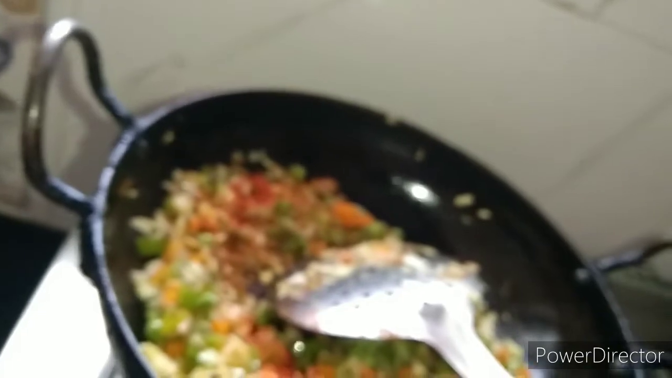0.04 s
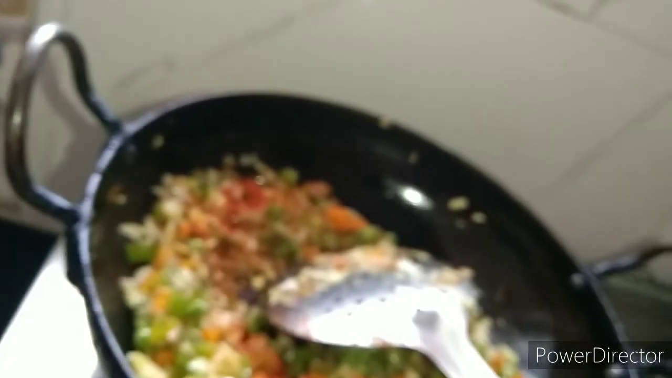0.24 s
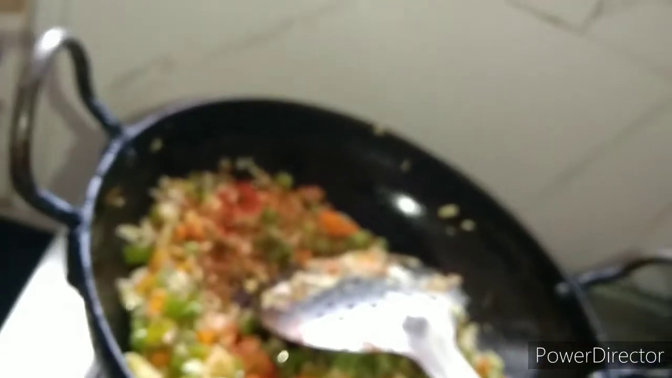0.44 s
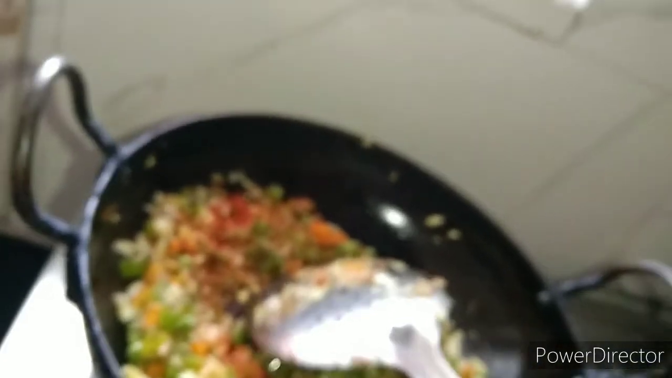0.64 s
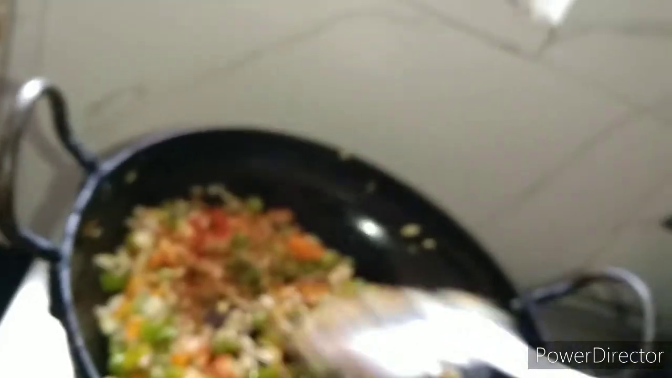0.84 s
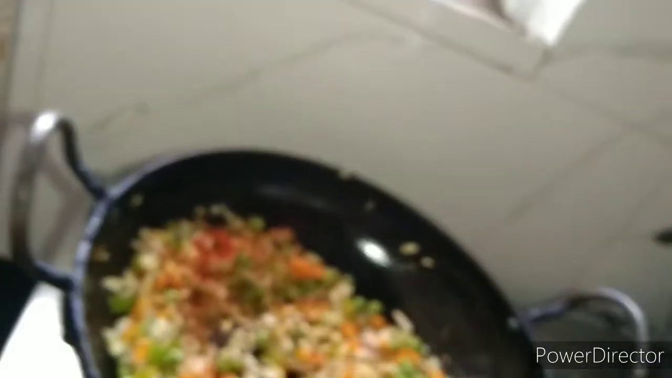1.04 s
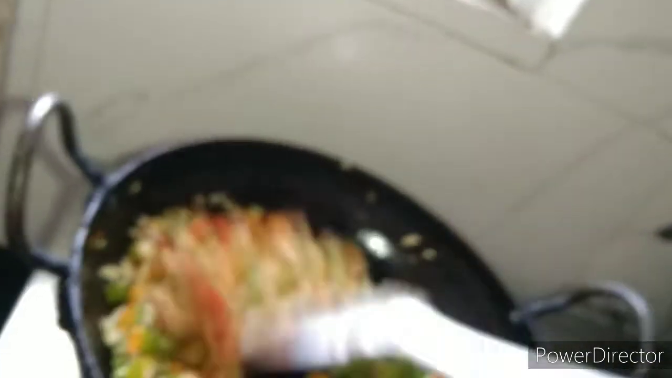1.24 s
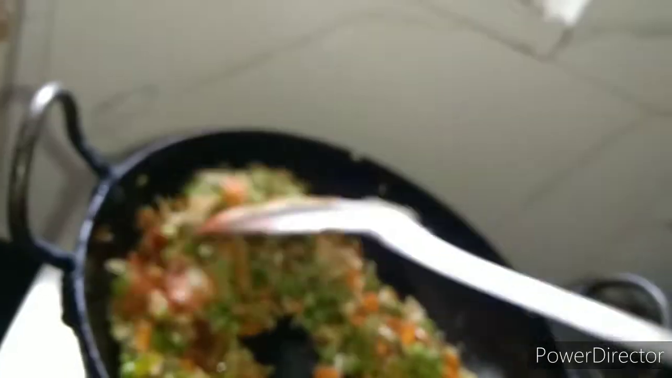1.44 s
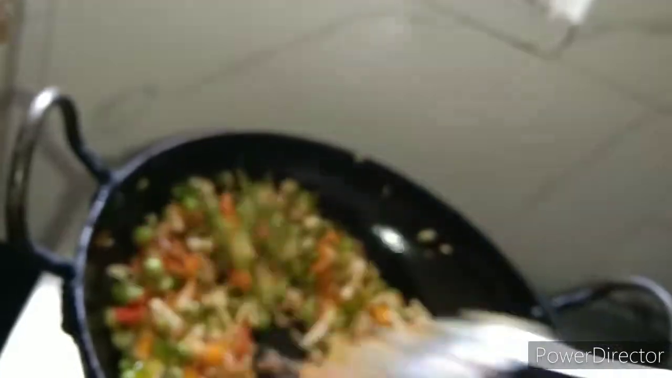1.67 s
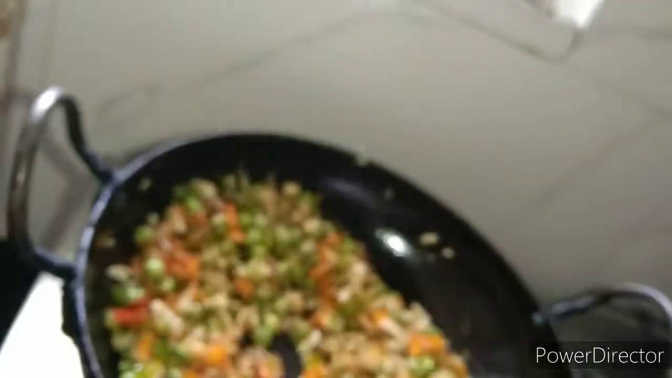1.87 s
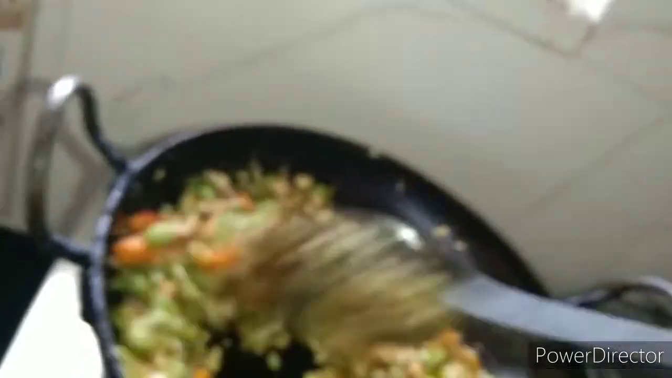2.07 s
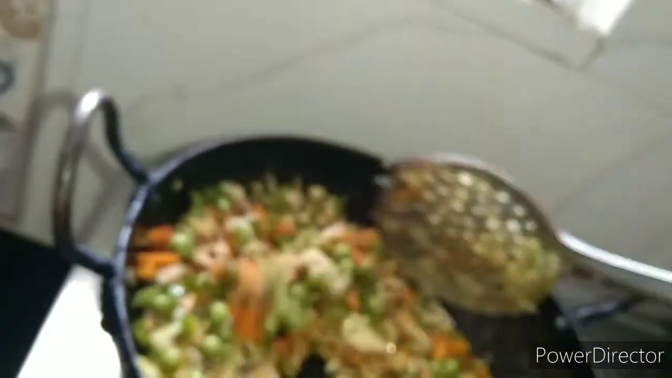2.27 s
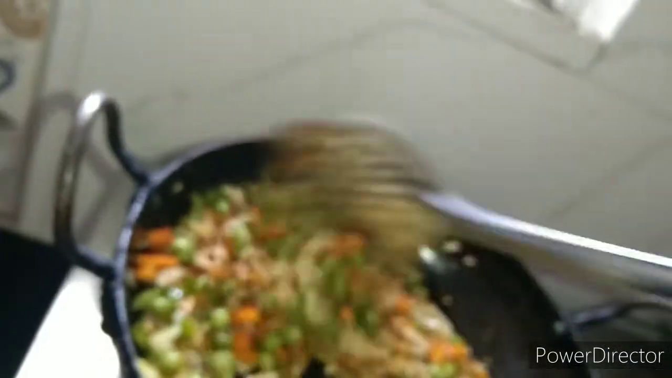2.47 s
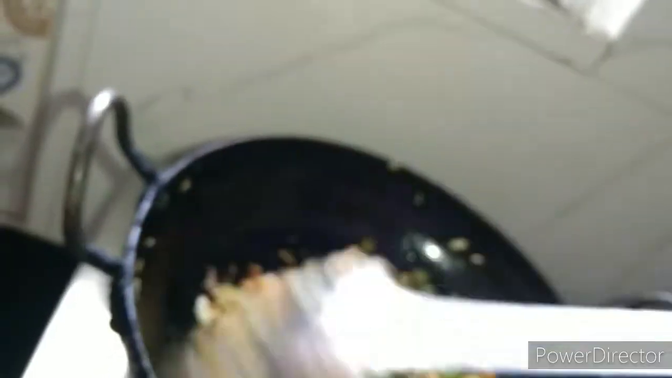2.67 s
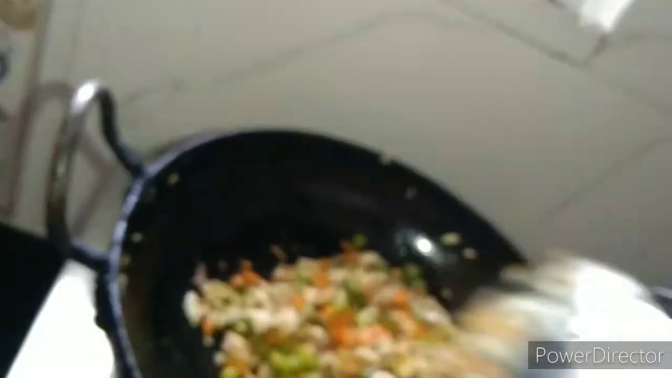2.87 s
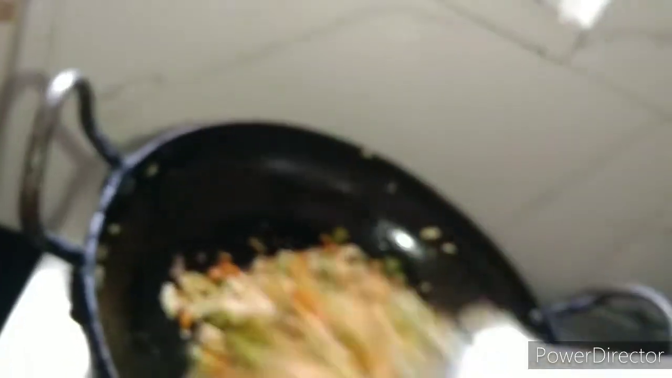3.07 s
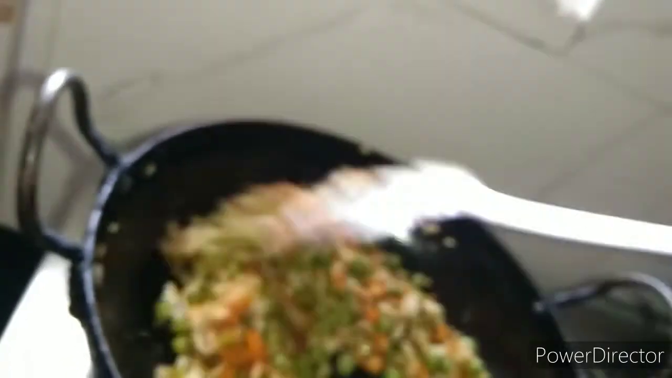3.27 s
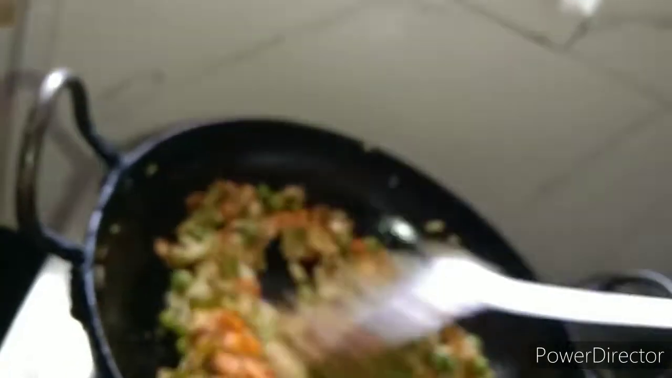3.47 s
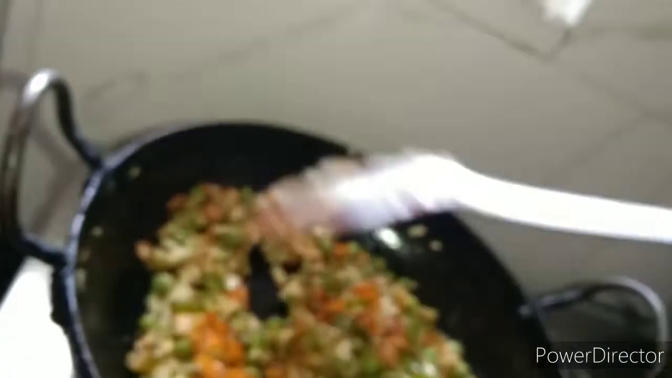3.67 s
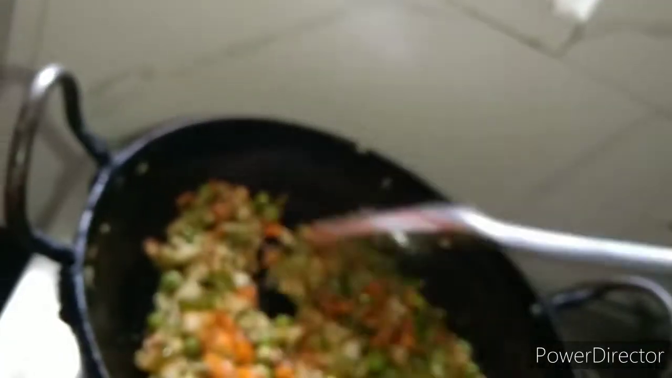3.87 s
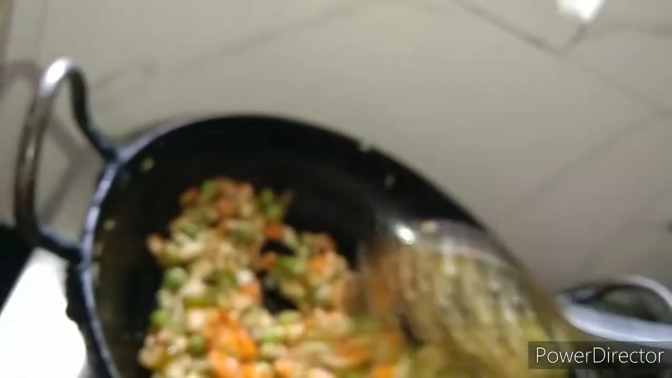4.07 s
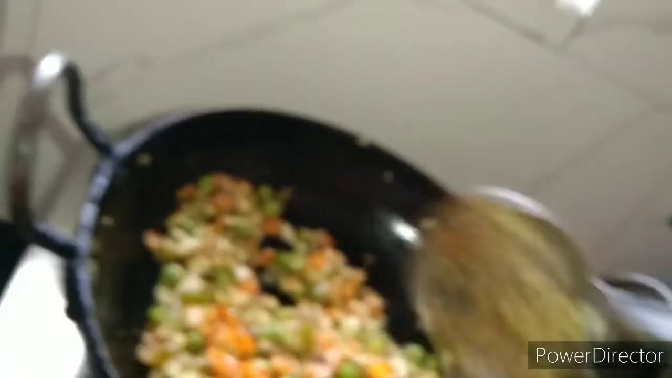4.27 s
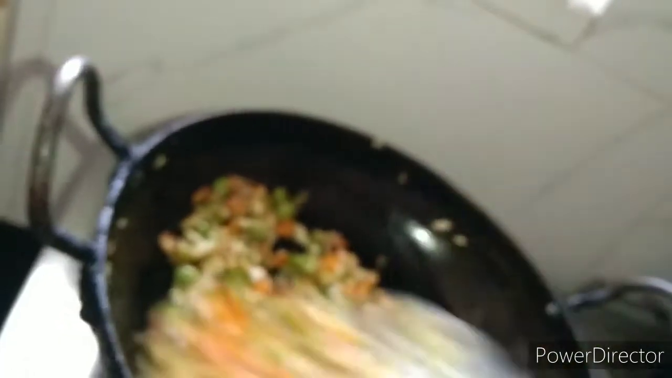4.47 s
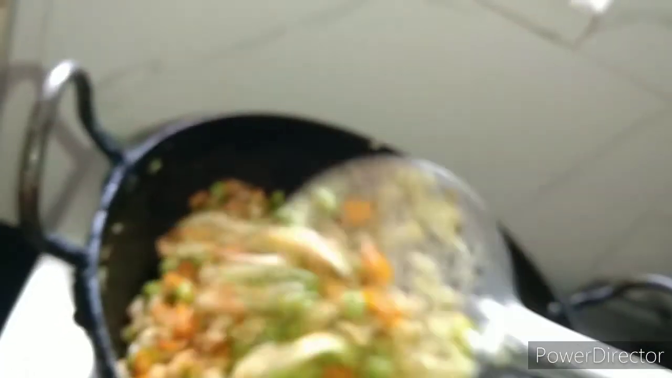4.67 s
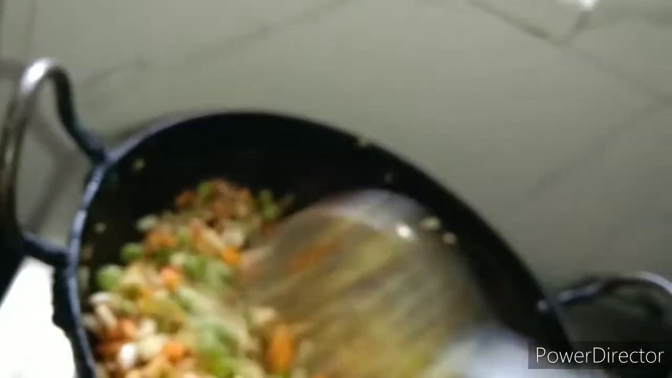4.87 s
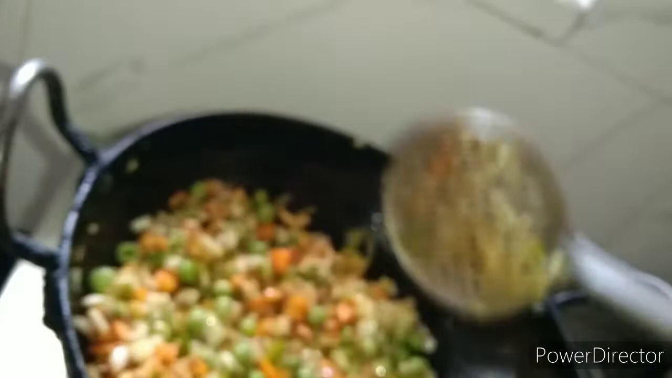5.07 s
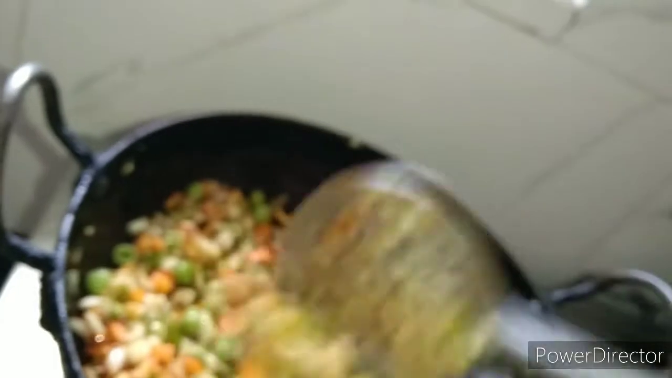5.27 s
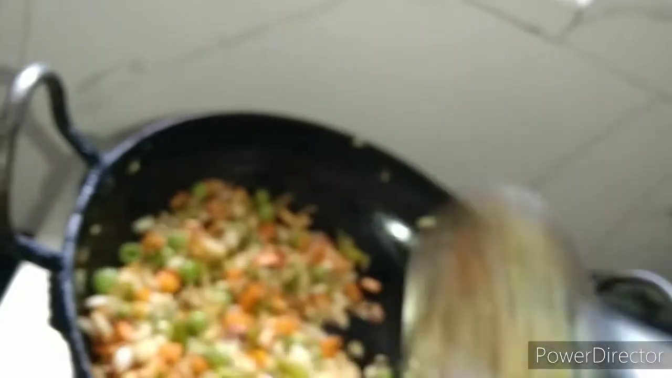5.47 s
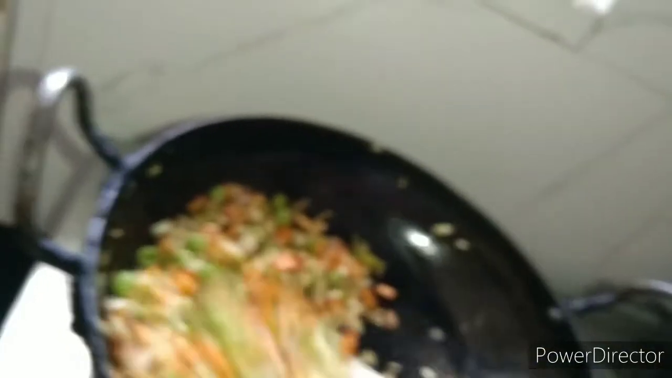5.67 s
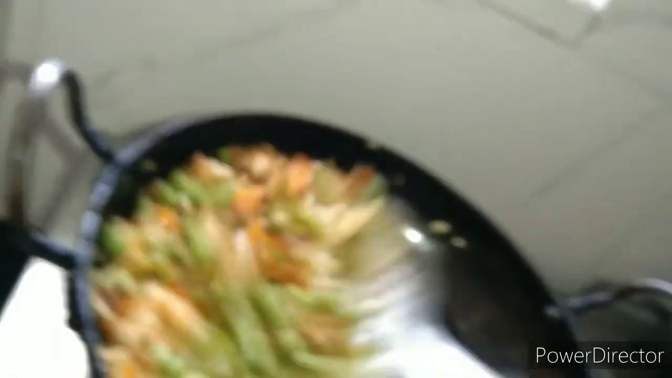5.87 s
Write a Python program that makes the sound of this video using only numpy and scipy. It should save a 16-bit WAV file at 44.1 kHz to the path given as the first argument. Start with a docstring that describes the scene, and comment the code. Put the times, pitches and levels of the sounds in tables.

```python
"""Frying vegetables in an iron pan

Close up, in a small tiled kitchen, steam bubbles burst in hot oil. A steel spatula knocks on the
pan, ringing bowl, rim and blade, squeaks once on bare iron and scrapes through the food. Once the
heap is turned, wet pieces meet the oil and the quiet simmer swells into a full sizzle.
Underneath lie a low rumble and a few soft bumps from the hand on the microphone."""
import sys
import numpy as np
from scipy import signal
from scipy.fft import rfft, irfft
from scipy.io import wavfile
from scipy.ndimage import uniform_filter1d

SR = 44100
rng = np.random.default_rng(int(sys.argv[2]) if len(sys.argv) > 2 else 0)


def output_pcm(signal):
    """Save a mono or channel-first signal as 16-bit PCM at the path in sys.argv[1].

    Samples are clipped to [-1, 1] before scaling.
    """
    pcm = np.clip(np.atleast_2d(signal).T, -1, 1) * 32767
    wavfile.write(sys.argv[1], SR, np.round(pcm).astype(np.int16))


N = 261513
TAPS = 4096
BINS_HZ = np.fft.rfftfreq(TAPS, 1 / SR)

# Tone colours. Each row: frequency in Hz, relative spectral level in dB.
RUMBLE_COLOUR = [(20, -51), (32, -34), (45, 6), (62, 5), (90, 2.5), (140, -7.5), (300, -12), (700, -31.5)]  # the kitchen's low end
SIMMER_COLOUR = [(150, -4), (400, 3.5), (1000, 5.5), (1600, -2), (2800, -3), (4800, 3.5), (7000, 1),
                 (11500, 0.5), (13500, -9), (15700, -18)]  # the resting heap
BODY_COLOUR = [(60, -31.5), (160, -19.5), (300, -9.5), (430, -3.5), (560, -6.5), (720, 1), (1050, 2.5),
               (1300, -3.5), (1550, -3), (1900, -8.5), (4000, -19)]  # a contact heard through the pan's bowl,
CLANG_COLOUR = [(200, -44), (900, -35), (1600, -17), (2400, -8.5), (2950, 2.5), (3500, -4), (4200, -0.5),
                (5100, 0.5), (6500, -10.5), (9000, -33)]  # through the steel blade,
TICK_COLOUR = [(3000, -46), (6200, 5.5), (8300, 2.5), (12200, -2.5), (14000, -15.5), (16000, -41)]  # and through its edge
SIZZLE_COLOUR = [(100, -25), (300, -26.5), (600, -13.5), (1050, -3.5), (1250, -10), (1500, -6.5),
                 (2000, -8.5), (3000, -2.5), (4400, 5), (6500, 2), (8000, 5), (11800, 2.5), (13500, -4),
                 (15800, -14)]  # wet food in hot oil
FIZZ_COLOUR = [(3000, -24), (8000, -14.5), (11200, 8), (15500, -7.5)]  # the finest bubbles

# Strokes through the food. Each row: start in seconds, length in seconds, strength in dB,
# hardness in dB (plus for bare steel, minus when cushioned by food).
SCRAPES = [(0, 0.062, -69, -19), (.114, 0.072, -37, -2.5), (.36, 0.021, -59.5, 26),
           (.803, 0.092, -50.5, -2), (.949, .1, -51.5, -3.5), (1.215, 0.12, -56.5, -11),
           (1.31, 0.039, -33, 7), (1.362, .078, -43, -3.5), (2.487, 0.055, -64.5, -13.5),
           (2.605, 0.1, -50.5, 5.5), (3.187, 0.03, -42, 1), (3.238, 0.02, -34, 12), (4.604, 0.035, -43, 11),
           (5.657, 0.089, -40.5, 16), (5.796, 0.071, -43, 13), (5.837, 0.087, -42, -5)]
# Spatula blows. Each row: start in seconds, strength in dB, hardness in dB, height on the pan's
# wall from 0 to 1, length of the following slide in seconds, the spot's favoured frequency in Hz.
KNOCKS = [(.1012, -27, 16, 0.6, 0.0019, 12800), (.875, -33.5, -1.5, 0.3, 0.063, 3310),
          (1.2001, -27, 13, 0.91, 0, 11100), (1.2926, -23.5, 3.5, 0.21, 0.028, 4360),
          (1.407, -46.5, -14, 0, 0, 860), (2.587, -56.5, -11, 0.45, 0.00098, 1030),
          (3.2202, -20, 1, 0.22, 0.096, 3950), (4.0116, -44, -17, 0.44, 0.0075, 1257),
          (4.412, -28.5, 3.5, 0.26, 0.013, 3150), (4.4553, -22.5, 6.5, 0.97, 0.0708, 1680),
          (4.668, -35.5, 0, 0.68, 0.081, 1020), (5.082, -69, -18, 0.27, 0.0032, 690),
          (5.269, -33, -1.5, 0.62, .018, 162), (5.562, -28.5, 4, 0.72, .015, 3000)]
# The grip retunes the blade. Each row: start in seconds, pitch factor.
GRIPS = [(0, .93), (1.25, 1.055), (2.4, 1), (4.3, 1.07), (5.4, 1)]

# Ringing metal. Each row: frequency in Hz, relative level in dB, time to fall 60 dB in seconds.
BLADE_MODES = [(2096, -1, .42), (2140, -8, .3), (2740, -8, .25), (2880, -4, .3), (3946, -1, .4),
               (4018, -7, .3), (4183, -7, .25), (4530, -8, .18), (4836, -8, .35), (5020, -10, .2),
               (5445, -9, .25), (7192, -15, .2), (8440, -12, .2)]  # before the grip retunes them
BOWL_MODES = [(162, -13.5, 1.9), (432, 1, .8), (695, -5, .45), (728, -6, .6), (872, -7, .4),
              (1030, -2, .36), (1100, -8, .3)]
RIM_MODES = [(1440, -2, .33), (1518, -4, .48), (1571, -7, .25)]
EDGE_MODES = [(680, -3, .2), (805, -3, .2), (1010, 0, .22), (5835, -3, .3), (9175, -2, .22),
              (10742, 1, .28), (11100, 0, .08), (12785, 2, .08), (13043, -1, .18), (14000, 5, .012),
              (14900, 4, .012)]

# Handling thumps. Each row: start in seconds, length in seconds, level in dB, pitch in Hz.
BUMPS = [(0.311, 0.083, -54, 69), (1.83, 0.037, -44.5, 62), (1.893, 0.073, -38.5, 57.4)]
# Turns of the heap. Each row: start in seconds, level of the swell of sizzle in dB.
TURNS = [(1.29, -45), (1.73, -43.5), (1.95, -45), (2.59, -47), (2.85, -46.5), (3.16, -42), (3.55, -42),
         (4.03, -40.5), (4.25, -46.5), (4.92, -44.5), (5.299, -44), (5.6, -43.5)]
# Reverb decay. Each row: frequency in Hz, time to fall 60 dB in seconds.
ROOM_T60 = [(200, 0.78), (1000, 0.66), (2000, 0.69), (4000, 0.46), (8000, 0.58), (15000, .22)]
# Reverb colour. Each row: frequency in Hz, level in dB against the direct sound.
ROOM_COLOUR = [(200, 5), (1000, -2.5), (2500, -2.5), (6000, -6.5), (14000, -4)]


def amp(db):
    """Decibels to gain."""
    return 10 ** (np.asarray(db) / 20)


def unit_rms(x):
    """Scales to rms 1."""
    return x / np.sqrt(np.mean(x ** 2) + 1e-20)


def curve_at(points, hz):
    """Reads a curve on a log-frequency axis."""
    point_hz, value = np.transpose(points)
    return np.interp(np.log(hz + 1), np.log(point_hz + 1), value)


def eq_gains(colour):
    """A tone colour as EQ gains of mean power 1."""
    return unit_rms(amp(curve_at(colour, BINS_HZ)))


def bell(hz, centre_hz, octaves=0.41):
    """Bell curve: 1 at the centre frequency, 0 far from it."""
    return np.exp(-(np.log2(hz / centre_hz) / octaves) ** 2)


def equalise(x, gains):
    """Minimum-phase EQ: nothing sounds before its cause."""
    cepstrum = irfft(np.log(gains + 1e-5))
    cepstrum[1:TAPS // 2] *= 2
    cepstrum[TAPS // 2 + 1:] = 0
    return signal.fftconvolve(x, irfft(np.exp(rfft(cepstrum))))


def add(mix, start_s, sound):
    """Lays a sound into the mix."""
    part = mix[max(round(start_s * SR), 0):][:len(sound)]
    part += sound[:len(part)]


def clicks(n, per_s, spread_db):
    """Random clicks, many small and a few large."""
    chance, size, sign = rng.random((3, N))[:, :n]
    level_db = spread_db * np.minimum(-np.log(1 - size), 5)
    return unit_rms((chance < per_s / SR) * np.sign(sign - .5) * amp(level_db))


def waver(rate_hz):
    """Smooth random modulation of rms 1."""
    rolloff = 1 + (np.fft.rfftfreq(N, 1 / SR) / rate_hz) ** 2
    return unit_rms(irfft(rfft(rng.standard_normal(N)) / rolloff, N))


def rumble(level_db=-66):
    """The kitchen's room tone: a bed of deep noise."""
    return amp(level_db) * unit_rms(equalise(rng.standard_normal(N), eq_gains(RUMBLE_COLOUR))[:N])


def simmer(level_db=-57.5):
    """Small steam bubbles burst under the resting heap, with sparser pops among them."""
    bubbles = clicks(N, per_s=6000, spread_db=3)
    pops = amp(-10.5) * clicks(N, per_s=55, spread_db=2.5)
    return amp(level_db) * equalise(bubbles + pops, eq_gains(SIMMER_COLOUR))[:N]


def contact(force, body_db, clang_db, tick_db, spot_db):
    """One force sounds in three voices: the bowl's body, the blade's clang and the edge's tick."""
    voices = [(BODY_COLOUR, body_db), (CLANG_COLOUR, clang_db), (TICK_COLOUR, tick_db)]
    power = sum((amp(db) * eq_gains(colour)) ** 2 for colour, db in voices)
    return equalise(force, amp(spot_db) * np.sqrt(power))


def ring(modes, pitch=1, unsteady=0.0024):
    """Metal rings as dying sines, one second long; their pitch wavers as the contact shifts."""
    t = np.arange(SR) / SR
    drifts = uniform_filter1d(rng.standard_normal((len(modes), SR)), size=300, axis=1)
    tones = np.zeros(SR)
    for (hz, db, t60), drift in zip(modes, drifts):
        cycles = hz * pitch * np.cumsum(1 + unsteady * unit_rms(drift)) / SR
        tones += amp(db - 60 * t / t60) * np.sin(2 * np.pi * cycles)
    return tones * np.minimum(1, 10 * (1 - t))


def grip_pitch(now_s):
    """Pitch factor of the blade under the present grip."""
    return [pitch for start_s, pitch in GRIPS if start_s <= now_s][-1]


def rubbed(force, metal):
    """Slips feed a ringing piece of metal."""
    return signal.fftconvolve(force, metal / np.linalg.norm(metal))


def slides(delay_s=.008, base_db=-42, follow=0.14, reference_db=-28, hardness_db=-5.5):
    """After a blow the arm pushes on, firmer after a strong one. Gives rows like those of SCRAPES."""
    return [(start_s + delay_s, slide_s, base_db + follow * (strength_db - reference_db), hardness_db)
            for start_s, strength_db, _, _, slide_s, _ in KNOCKS if slide_s > .005]


def scrapes(uneven_db=1.5, fade_share=0.42, t60_factor=0.45):
    """The blade sticks and slips over the iron in uneven bursts; pressing it down chokes its ring."""
    out = np.zeros(N)
    pressure = amp(uneven_db * waver(rate_hz=6.1))
    # sliding feeds the blade's middle modes most, and the hollow of the bowl more than its bass
    pressed = [(hz, db + 7 * bell(hz, 5600, octaves=0.79), t60 * t60_factor)
               for hz, db, t60 in BLADE_MODES]
    bowl_db = 3 * bell(BINS_HZ + 1, 1020, octaves=0.29) - 3 * bell(BINS_HZ + 1, 154, octaves=0.62)
    for start_s, length_s, strength_db, hardness_db in list(SCRAPES) + slides():
        n = round(length_s * SR)
        slips = clicks(n, per_s=3200, spread_db=3) * np.roll(pressure, -round(start_s * SR))[:n]
        force = unit_rms(slips * signal.windows.tukey(n, fade_share))
        tick_db = strength_db - 6 + 0.63 * hardness_db
        ring_db = strength_db - 8 + 0.26 * hardness_db
        add(out, start_s, contact(force, strength_db - hardness_db, strength_db, tick_db, bowl_db))
        add(out, start_s, amp(ring_db) * rubbed(force, ring(pressed, grip_pitch(start_s))))
    return out


def knocks(blow_s=0.0086, chatter_s=0.011, spot_ring_db=6, spot_noise_db=4):
    """The blade lands, chatters and wakes the modes of the spot it hits. Gives clatter and ringing."""
    clatter, ringing = np.zeros((2, N))
    t = np.arange(TAPS) / SR
    for start_s, strength_db, hardness_db, height, _, spot_hz in KNOCKS:
        body_db = strength_db - hardness_db
        tick_db = strength_db - 4 + 0.14 * hardness_db + 5 * height
        decay_s = chatter_s * 2 ** (hardness_db / 20)  # bare steel chatters longer
        chatter = clicks(TAPS, per_s=12000, spread_db=1) * np.exp(-t / decay_s)
        flatten = 1 / uniform_filter1d(abs(rfft(chatter)), size=40)  # a blow drives all bands alike
        force = np.sqrt(blow_s * SR) * equalise(chatter, flatten)
        spot_db = spot_noise_db * bell(BINS_HZ + 1, spot_hz)
        add(clatter, start_s, contact(force, body_db, strength_db, tick_db, spot_db))
        bowl_db = body_db - 31 + 22 * height  # food damps the bowl; a high blow frees it
        rim_db = body_db - 22 + 22.5 * height ** 2  # the rim answers to blows close to it
        blade_db = strength_db - 7 - 16 * height  # the blade rings less against the wall
        for modes, level_db, pitch in [(BOWL_MODES, bowl_db, 1), (RIM_MODES, rim_db, 1),
                                       (BLADE_MODES, blade_db, grip_pitch(start_s))]:
            woken = [(hz, db + spot_ring_db * bell(hz * pitch, spot_hz), t60) for hz, db, t60 in modes]
            add(ringing, start_s, amp(level_db) * ring(woken, pitch, unsteady=0.0095))
    return clatter, ringing


def skid(start_s=.104, length_s=0.061, squeak_db=-31, grit_db=-38):
    """Rapid slips on bare iron drive the blade's edge into a rough, shrill squeak that rings out."""
    out = np.zeros(N)
    slips = clicks(round(length_s * SR), per_s=3000, spread_db=4.5)
    shrill_db = 10 * bell(BINS_HZ + 1, 14000, octaves=0.62)
    add(out, start_s, amp(squeak_db) * rubbed(slips, ring(EDGE_MODES, unsteady=0.0065)))
    add(out, start_s, equalise(slips, eq_gains(TICK_COLOUR) * amp(grit_db + shrill_db)))
    return out


def hand_bumps():
    """Dull thumps reach the microphone through the hand that holds it."""
    out = np.zeros(N)
    for start_s, length_s, db, hz in BUMPS:
        t = np.arange(round(length_s * SR)) / SR
        add(out, start_s, amp(db) * np.sin(2 * np.pi * hz * t) * np.sin(np.pi * t / length_s))
    return out


def sizzle(start_s=1.27, rise_s=.15, steady_db=-45.5, swell_peak_s=0.12, flutter_db=0.93):
    """Wet food bubbles and spits in the oil; each turn of the heap adds a swell that boils away."""
    t = np.arange(N) / SR
    power = (amp(steady_db) * np.clip((t - start_s) / rise_s, 0, 1)) ** 2
    for turn_s, db in TURNS:
        age = np.maximum(t - turn_s, 0) / swell_peak_s
        power += amp(db) ** 2 * age * np.exp(1 - age)
    bubbles = clicks(N, per_s=10000, spread_db=2.5) * amp(flutter_db * waver(rate_hz=90))
    spits = amp(-9) * clicks(N, per_s=510, spread_db=2)
    return np.sqrt(power) * equalise(bubbles + spits, eq_gains(SIZZLE_COLOUR))[:N]


def fizz(peak_s=2, width_s=0.7, level_db=-49):
    """The first wet pieces to touch the oil flash into finer bubbles: one bright swell."""
    t = np.arange(N) / SR
    swell = amp(level_db) * np.exp(-((t - peak_s) / width_s) ** 2)
    return swell * equalise(clicks(N, per_s=8000, spread_db=6), eq_gains(FIZZ_COLOUR))[:N]


def kitchen(x, predelay_s=.004, echoes_per_s=4000):
    """Tiled walls add dense reflections to the direct sound; the treble dies first."""
    echoes = rng.choice([-1., 1.], SR) * (rng.random(SR) < echoes_per_s / SR)
    echoes *= np.arange(SR) > predelay_s * SR
    hz, t, bands = signal.stft(unit_rms(echoes), SR, nperseg=256)
    t60 = curve_at(ROOM_T60, hz)[:, None]
    unit_energy = np.sqrt(2 * np.log(1000) / (t60 * SR))
    bands *= amp(curve_at(ROOM_COLOUR, hz)[:, None] - 60 * t / t60) * unit_energy
    tail = signal.istft(bands, SR, nperseg=256)[1]
    return x + signal.fftconvolve(x, tail)[:N]


def scene(clatter_db=-4, scrape_db=-3, ring_send=0.4):
    """Spatula and frying in the room over the low end, the same in both channels."""
    clatter, ringing = knocks()
    spatula = kitchen(amp(clatter_db) * clatter + amp(scrape_db) * scrapes() + skid())
    # the metal's ring is heard mostly direct, with only a little room
    spatula += (1 - ring_send) * ringing + ring_send * kitchen(ringing)
    low_cut = signal.butter(3, 135, "high", fs=SR, output="sos")  # a small pan radiates little bass
    frying = kitchen(sizzle() + fizz() + simmer())
    mono = signal.sosfilt(low_cut, spatula) + frying + rumble() + hand_bumps()
    return np.array([mono, mono])


def record(dry, ceiling=.52, cutoff_hz=15750):
    """Soft clipping rounds the highest peaks, then a steep low-pass trims the top."""
    rounded = ceiling * np.tanh(dry / ceiling)
    low_pass = signal.firwin(401, cutoff_hz, window=("kaiser", 8), fs=SR)
    return signal.oaconvolve(rounded, low_pass[None], "same")


dry = scene()
out = record(dry)
output_pcm(out)
```